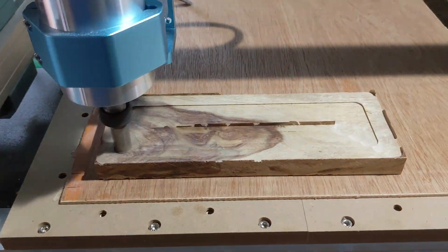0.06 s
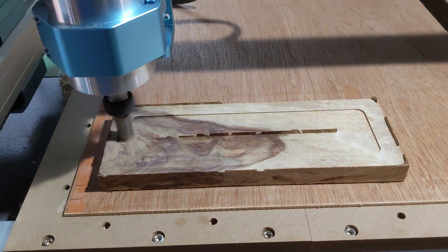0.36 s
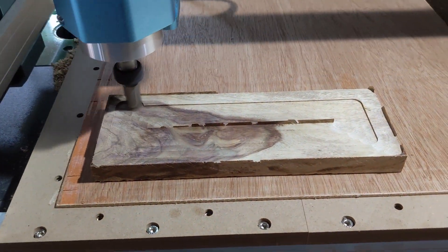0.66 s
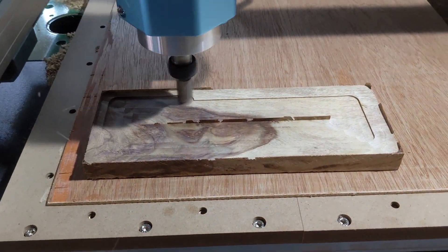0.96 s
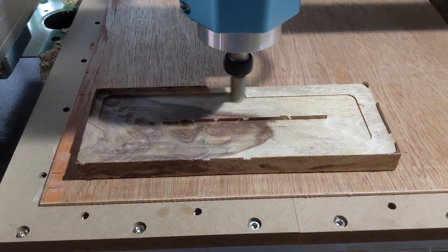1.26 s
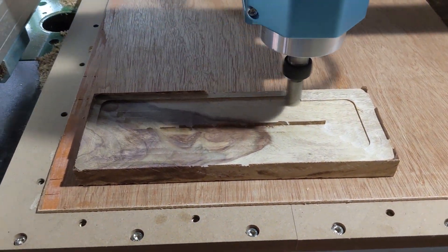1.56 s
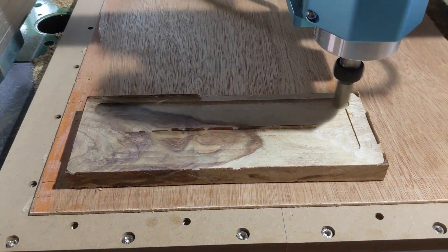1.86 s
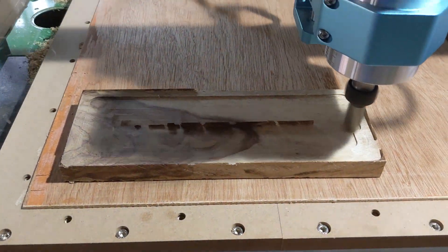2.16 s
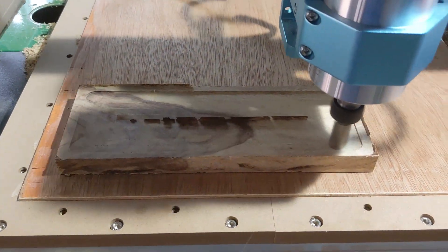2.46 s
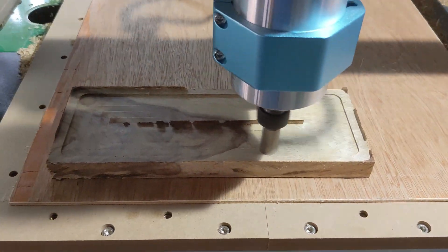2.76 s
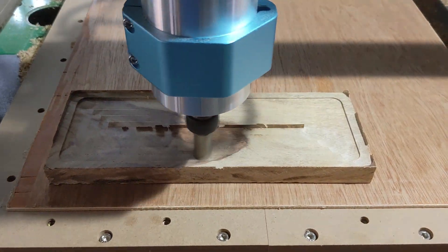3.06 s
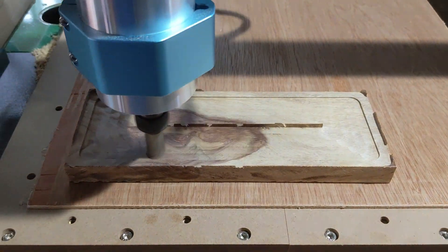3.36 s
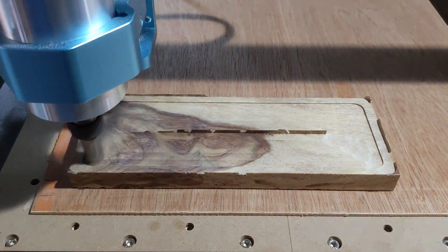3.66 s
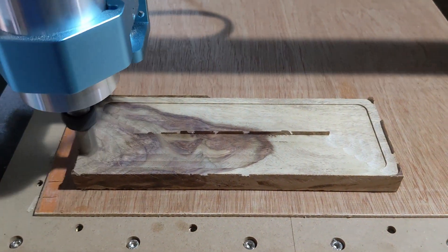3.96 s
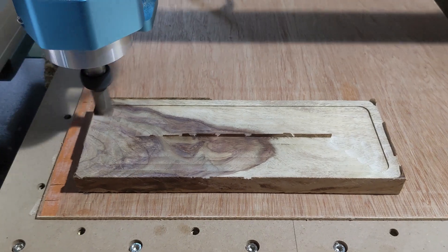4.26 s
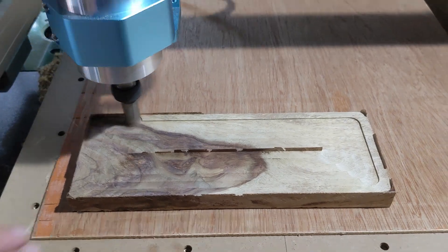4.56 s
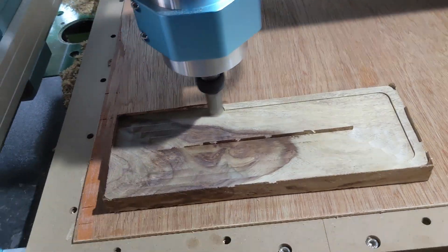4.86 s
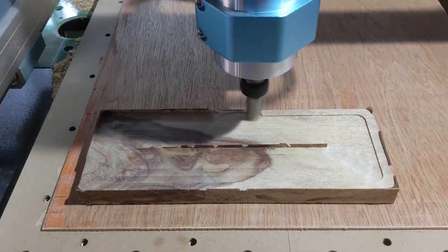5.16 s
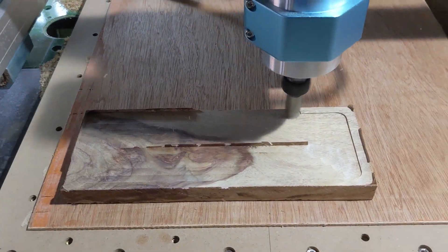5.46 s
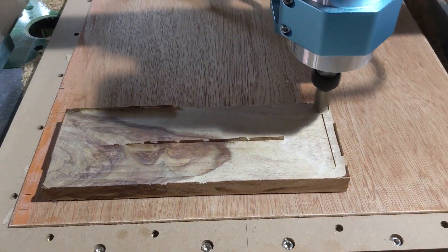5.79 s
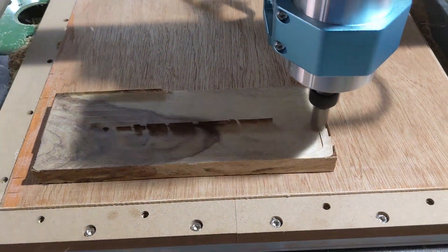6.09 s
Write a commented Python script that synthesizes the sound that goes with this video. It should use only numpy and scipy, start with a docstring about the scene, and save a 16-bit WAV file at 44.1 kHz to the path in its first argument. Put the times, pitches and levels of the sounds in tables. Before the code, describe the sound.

From the first moment, a carving machine's spindle whines at a high, constant pitch, heard from close by as its bit skims a wooden board. A fluttering rush of cooling air and rasping chips runs with it, and the moving frame rumbles faintly underneath, a little more around 2 seconds and near the end. The overall level stays fairly even, but tones within the whine swell, ease and shift gently between left and right as the head travels. Thin squeals flare where the bit bites, around 1.5, 2.7 and 3.2 seconds, then in a brighter cluster from 4.3 to 4.9 seconds and again near 5.6. The cutting rasp grows slightly stronger around 5.3 seconds, and the dust hiss is a bit brighter late on. A few dull bumps are barely audible. The machine is still running at the end, about 6 seconds in.

```python
"""Carving machine lapping a board

A spindle at about 30000 rpm skims its bit nearly twice round a wooden board. Shaft orders (harmonics
of the rotation) whine over a fluttering rush of cooling air and rasping chips; the gantry rumbles
faintly. As the head travels, the sound shifts between two close microphones and tones swell and ease."""
import sys
import numpy as np
from scipy import signal
from scipy.io import wavfile
from scipy.ndimage import uniform_filter1d

SR = 44100
rng = np.random.default_rng(int(sys.argv[2]) if len(sys.argv) > 2 else 0)


def master(y):
    """Save y as 16-bit WAV."""
    cut = np.clip(np.atleast_2d(y).T, -1, 1)
    pcm = np.round(cut * 32767)  # scale
    wavfile.write(sys.argv[1], SR, pcm.astype(np.int16))


N = 274743
TIME = np.arange(N) / SR
SHAFT_HZ, TOP_HZ = 506.25, 15750

# The board's corners: near left, far left, far right, near right.
# Each row: steps right of the middle, steps nearer than the middle.
CORNERS = [(-1, 1), (-1, -1), (1, -1), (1, 1)]
# When the head turns each corner, in seconds, clockwise from near left.
CORNER_TIMES = [.04, .62, 1.85, 2.35, 3.72, 4.42, 5.7, 6.25]
# Stereo delay of the moving head. Each row: time in seconds, lag of the left microphone in ms.
LEFT_LAG = [(0.0, 0.12), (0.16, 0.17), (0.4, 0.13), (1.02, 0.13), (1.27, 0.082), (1.85, -0.01),
            (2.25, -0.015), (2.79, 0.04), (3.5, 0.16), (3.85, 0.189), (4.1, 0.14), (4.45, 0.15),
            (4.66, 0.18), (4.88, 0.08), (5.54, 0.023), (6.22, -0.017)]
# The core of the whine; pan is always left minus right. Each row: order, base level in dB, its change
# per step right and per step nearer, pan in dB, its change per step right and per step nearer,
# left phase lead in radians, reflected share from 0 to 1.
STRONG_TONES = [(1, -51, -5.5, -0.86, 4, 4, 1, 1, 0.06), (2, -51.5, 1.5, -0.5, 1, 0.5, 0.41, 0.38, 0.12),
                (3, -47.5, 1.36, 2.4, -0.5, 0, 1, -1.03, 0.08),
                (8, -40.5, -0.54, 0.94, 1.9, 2.5, -2.9, 0.11, 0.02),
                (12, -58.5, .9, -0.8, -9.5, 3.5, -2.8, 0.85, 0.27),
                (24, -65.5, 0, 0, 0, 2, -.4, 0.14, 0.24)]
# The sheen on the whine. Each row: order, relative level in dB, pan in dB.
WEAK_TONES = [(4, -56, -4.5), (5, -60.5, 0), (6, -54, 8), (7, -57.5, 0), (9, -57.5, 12), (10, -61.5, 5),
              (11, -69, -3), (13, -59.5, 1), (14, -62.5, -45), (15, -64.5, -7), (16, -59.5, -26),
              (17, -62, 25), (18, -66, -0.8), (19, -66, -4), (20, -64.5, -2), (21, -63.5, -5.5),
              (22, -68, -5), (23, -63.5, 1), (25, -64, 1), (26, -79, -2), (27, -76, -4), (28, -76.6, -7),
              (29, -67, -2), (30, -86, 5), (31, -73, -1)]
# Places on each lap where a tone dips, swells or squeals at a corner. Each row: order, place in sides
# from the near left corner, half width in sides, left gain in dB, right gain in dB.
LAP_SPOTS = [(1, .82, 0.21, -13, -6), (1, 1.65, 0.29, -17, 2.5), (1, 3.67, 0.25, -25, -2),
             (2, 0.15, 0.17, 2.5, 8), (2, 1, 0.22, -7, -3), (2, 2.95, 0.11, 4.5, 4),
             (2, 3.78, .15, -14, -0.5), (3, 0.029, 0.088, -7, -10), (3, 0.34, .12, 5.5, 8.5),
             (3, 0.91, 0.097, -8, -3.5), (3, 1.24, 0.43, 4, -3.5), (3, 2.4, 0.28, 3, 2.5),
             (3, 3.07, 0.11, -10, -4), (3, 3.83, 0.23, 3, -0.5), (4, 3.93, 0.057, 3, 14.5),
             (4, 0.32, 0.16, 12, 5.5), (8, 1.67, 0.6, -1.5, 0), (8, 1.78, 0.15, -1.5, 0),
             (8, 2.57, 0.5, 1.5, 0), (12, 3.03, 0.27, 10, 8.5), (13, 1.98, 0.18, 5, 15),
             (14, 2.03, 0.16, 25, 17.5), (15, 2.37, 0.16, 4, 15), (24, 2.75, 0.28, -9, 10)]
# The bit sings where it bites. Each row: middle and half length in seconds, pitch and half width in Hz,
# lift in dB.
BIT_SQUEALS = [(1.41, 0.29, 4050, 250, 3.5), (1.5, 0.65, 2340, 900, 3.5), (1.5, 0.45, 6075, 250, 7.5),
               (2.66, .22, 8550, 314, 8), (2.683, 0.24, 2480, 250, 11), (3.2, 0.19, 3370, 250, 11.5),
               (3.3, 0.062, 6075, 250, 10), (4.332, .075, 7090, 300, 7), (4.623, 0.22, 4050, 250, 1.5),
               (4.53, 0.023, 4970, 250, 23), (4.52, 0.19, 14700, 1680, 13.5), (4.55, 0.2, 10000, 1500, 7),
               (4.72, 0.074, 6075, 250, 5), (4.8, .2, 5100, 250, 14), (5.52, 0.1, 5440, 990, 4.5),
               (5.6, 0.1, 10500, 400, 13)]
# Tone colour of the rush. Each row: frequency in Hz, relative spectral level in dB, pan in dB,
# left-right likeness from 0 to 1.
RUSH_SPECTRUM = [(30, -27.5, 0, .98), (150, -16.5, -1, 0.97), (387, -9, .5, 0.6), (540, 1.2, -1, 0.93),
                 (760, 2, 2.5, 0.66), (1100, 6, 1.5, 0.54), (1520, 3, 1, 0.22), (2360, -1, -1.5, 0.05),
                 (3930, 7.5, -2.5, 0.66), (4600, -0.6, 0, 0.44), (5300, 1.5, -3.5, 0),
                 (6230, -0.6, -1, 0.1), (7200, -5.5, -3, 0), (11000, -9.5, -2.5, 0), (15300, -13.5, 3, .02)]
# The table top turns the stereo phase. Each row: frequency in Hz, left lead in radians.
TABLE_TOP_PHASE = [(100, -0.099), (700, 0.72), (950, -0.52), (1600, -1.57), (2300, 0.81), (4000, -0.42),
                   (6500, 0.95)]
# Board, housing and the gap between them ring in the rush. Each row: centre and half width in Hz,
# lift in dB, extra dB per step nearer.
RESONANCES = [(194, 36, 4.5, 3.5), (650, 80, 0.8, 0), (925, 22, 7.5, 0), (1392, 25, 5, 1),
              (1617, 86, 2.5, -2.2), (2340, 210, 1.5, 3), (3020, 250, 0, -1.5), (3780, 230, -2, -1.5),
              (5050, 410, 1, -0.9), (6430, 520, 1, 2.5), (11400, 640, 1.5, 0)]
# How the rush swells, from gantry rumble to dust hiss. Each row: centre in Hz, trim in dB, then
# dB added per step right, per step nearer, per dB of cut and per dB of dust.
RUSH_BANDS = [(250, -1, -.9, -0.8, -0.5, 0), (900, .5, 0.9, 0.5, 0.37, -0.6),
              (1580, 1.6, -0.3, -0.7, 0.5, 0), (3900, -0.17, 0.06, -0.05, 1.2, 0),
              (10000, 0, 0, -0.5, 0.5, 1)]
# How hard the bit cuts. Each row: time in seconds, relative level in dB.
CUT_EFFORT = [(0, 0.5), (.3, -1.2), (.5, 1), (2, 0.54), (2.75, 1.5), (3.15, 0.2), (3.95, -0.3), (4.35, 0.5),
              (5.05, .6), (5.3, 3), (5.9, -0.9), (6.23, -.2)]
# The ride on the dust hiss. Each row: time in seconds, relative level in dB.
DUST_HISS = [(0, -0.5), (.3, -0.5), (.5, -.5), (2.3, 0.2), (2.8, 0.7), (3.2, 0), (4, 1.1), (4.35, 2.5),
             (5.3, 0.8), (6.23, 2.3)]
# The head shudders and chops the rush. Each row: rate in Hz, depth from 0 to 1.
HEAD_SHUDDER = [(16.5, 0.04), (33.5, 0.12), (43.1, 0.14)]
# Dull gantry bumps. Each row: start in seconds, level in dB, pitch in Hz, decay in seconds.
GANTRY_BUMPS = [(.32, -69, 37.8, .018), (2.53, -66, 66, 0.019), (3.739, -65.5, 221, 0.023)]


def whine(angle):
    """The lead tones: unbalance, two flutes and the fan's shrill eighth order follow the head's place."""
    _, across, nearness = head_route()
    out = np.zeros((2, N))
    for order, db, across_db, near_db, pan_db, pan_across, pan_near, lead, reflected in STRONG_TONES:
        gain = amp(db + across_db * across + near_db * nearness)
        pan = pan_gains(pan_db + pan_across * across + pan_near * nearness)
        out += gain * pan * shaft_tone(angle, order, lead, reflected)
    return out


def overtones(angle, trim_db=-5.0, treble_db=-1.0):
    """The weaker orders: a diffuse sheen, about half of it reflections."""
    out = np.zeros((2, N))
    for order, db, pan_db in WEAK_TONES:
        gain = amp(db + trim_db + treble_db * order * SHAFT_HZ / TOP_HZ)
        out += gain * pan_gains(pan_db) * shaft_tone(angle, order, lead=0, reflected=0.51)
    return out


def shaft_angle(drift_hz=0.27, drift_rate_hz=3):
    """The shaft's turn in radians; its speed hunts very slightly."""
    speed_hz = SHAFT_HZ + drift_hz * unit_rms(wander(drift_rate_hz).real)
    return 2 * np.pi * np.cumsum(speed_hz) / SR


def shaft_tone(angle, order, lead, reflected, sway_rad=0.99, sway_hz=0.72):
    """One order in stereo: a direct tone plus reflections that shift as the head moves."""
    lag_s = envelope(LEFT_LAG) / 1000
    left = np.exp(0.5j * (lead - 2 * np.pi * order * SHAFT_HZ * lag_s))
    direct = np.array([left, left.conj()])
    smear_hz = 7 + 0.9 * order  # moving reflections smear high orders more
    echoes = np.array([wander(smear_hz), wander(smear_hz)])
    arrival = np.sqrt(1 - reflected) * direct + np.sqrt(reflected) * echoes
    path_phase = 2 * np.pi * rng.random() + sway_rad * unit_rms(wander(sway_hz).real)
    tone = np.sqrt(2) * (arrival * np.exp(1j * (order * angle + path_phase))).real
    return tone * squeal_gain(order) * lap_spot_gain(order)


def squeal_gain(order):
    """An order flares when the flutes bite and the bit sings near its pitch."""
    middle_s, half_s, pitch_hz, half_hz, lift_db = np.transpose(BIT_SQUEALS)
    t = np.linspace(0, TIME[-1], num=2048)
    bites = np.exp(-((t - middle_s[:, None]) / half_s[:, None]) ** 2)
    in_tune = np.exp(-((order * SHAFT_HZ - pitch_hz) / half_hz) ** 2)
    extra_power = (in_tune * (amp(lift_db) ** 2 - 1)) @ bites
    return np.interp(TIME, t, np.sqrt(1 + extra_power))


def lap_spot_gain(order):
    """An order dips, swells or squeals at the same places on every lap, by its own amount on each side."""
    place = head_route()[0]
    sides, db = len(CORNERS), np.zeros((2, 1))
    for spot_order, centre, width, left_db, right_db in LAP_SPOTS:
        if spot_order == order:
            away = (place - centre + sides / 2) % sides - sides / 2
            db = db + np.array([[left_db], [right_db]]) * np.exp(-(away / width) ** 2)
    return amp(db)


def rush(level_db=-41.5, patchy_db=1.5, rumble_db_per_ms=50):
    """Air and chips: a bed of broad noise that swells with the cut and drifts in the stereo image."""
    frame, hop = 1024, 256
    hz = np.fft.rfftfreq(frame, 1 / SR)
    t = np.arange(N // hop + 5)[:, None] * hop / SR
    lag_ms, cut_db, dust_db = [envelope(table, t) for table in (LEFT_LAG, CUT_EFFORT, DUST_HISS)]
    _, across, nearness = head_route(t)
    colour_db, pan_db, likeness = spectra(RUSH_SPECTRUM, hz)

    noise = rng.standard_normal((5, len(t), len(hz)))
    left, unrelated = noise[0] + 1j * noise[1], noise[2] + 1j * noise[3]
    lead = spectra(TABLE_TOP_PHASE, hz)[0] - 2 * np.pi * hz * lag_ms / 1000
    right = (likeness * left + np.sqrt(1 - likeness ** 2) * unrelated) * np.exp(-1j * lead)

    ring_db = sum((db + near_db * nearness) * np.exp(-((hz - centre) / width) ** 2)
                  for centre, width, db, near_db in RESONANCES)
    trim_db, across_db, nearer_db, per_cut, per_dust = spectra(RUSH_BANDS, hz)
    swell_db = trim_db + across_db * across + nearer_db * nearness + per_cut * cut_db + per_dust * dust_db
    # the gantry rumbles more at the right end of the board, where the lag is smallest
    rumble_db = rumble_db_per_ms * (lag_ms.mean() - lag_ms) / (1 + (hz / 130) ** 4)
    # soft random patches in time and pitch keep the bed alive
    patches = uniform_filter1d(noise[4], size=30, axis=0)
    patches = unit_rms(uniform_filter1d(patches, size=8, axis=1))
    shape_db = colour_db + ring_db + swell_db + rumble_db + patchy_db * patches

    frames = np.array([left, right]) * pan_gains(pan_db)[:, None] * amp(shape_db)
    _, air = signal.istft(frames.transpose(0, 2, 1), nperseg=frame, noverlap=frame - hop)
    return amp(level_db) * unit_rms(air[:, :N])


def flutter(air, angle, turn_depth=0.055, flute_depth=0.021, grain_db=1.22, grain_hz=80):
    """Chop to add to the rush: puffs from each turn and flute, head shudder and uneven wood grain."""
    puffs = 1 + turn_depth * np.cos(angle) + flute_depth * np.cos(2 * angle)
    shudder = 1 + sum(depth * np.cos(2 * np.pi * (hz * TIME + rng.random())) for hz, depth in HEAD_SHUDDER)
    grain = amp(grain_db * unit_rms(wander(grain_hz).real))
    chop = unit_rms(puffs * shudder * grain) - 1
    low_cut = signal.butter(4, 400, "high", fs=SR, output="sos")  # the deep rumble stays smooth
    return signal.sosfiltfilt(low_cut, air * chop)


def gantry_knocks():
    """Far back in the mix, the gantry gives a soft low bump now and then."""
    out = np.zeros(N)
    for start_s, db, hz, decay_s in GANTRY_BUMPS:
        age = np.maximum(TIME - start_s, 0)
        bump = age / decay_s * np.exp(1 - age / decay_s)
        out += amp(db) * bump * np.sin(2 * np.pi * hz * age)
    return out


def head_route(t=TIME):
    """The head glides from corner to corner: its place in sides, its steps right and its steps nearer."""
    place = np.interp(t, CORNER_TIMES, np.arange(len(CORNER_TIMES)))
    sides = len(CORNERS)
    across, nearness = [np.interp(place, np.arange(sides), c, period=sides) for c in np.transpose(CORNERS)]
    return place, across, nearness


def wander(rate_hz, size=4096):
    """A smooth, complex random modulator of rms one, moving at up to about the given rate."""
    hz = np.fft.fftfreq(size, TIME[-1] / size)
    noise = rng.standard_normal(size) + 1j * rng.standard_normal(size)
    smooth = np.fft.ifft(noise / np.sqrt(1 + (hz / rate_hz) ** 4))
    return np.interp(TIME, np.linspace(0, TIME[-1], size), unit_rms(smooth))


def envelope(table, t=TIME):
    """Straight ramps between timed breakpoints."""
    return np.interp(t, *np.transpose(table))


def spectra(table, hz):
    """One curve per value column, joined on a log frequency axis."""
    points_hz, *columns = np.transpose(table)
    return [np.interp(np.log(hz + 1), np.log(points_hz), c) for c in columns]


def pan_gains(pan_db):
    """Equal-power left and right gains."""
    ratio = amp(np.atleast_1d(pan_db))
    return np.array([ratio, np.ones_like(ratio)]) * np.sqrt(2 / (1 + ratio ** 2))


def amp(db):
    """Decibels to gain."""
    return 10 ** (np.asarray(db) / 20)


def unit_rms(x):
    """Scales to an rms of one."""
    return x / np.sqrt(np.mean(abs(x) ** 2) + 1e-20)


def scene():
    """The mix: one shaft drives the tones and chops the rush, with the gantry underneath."""
    angle, air = shaft_angle(), rush()
    fluttering_air = air + flutter(air, angle)
    return whine(angle) + overtones(angle) + fluttering_air + gantry_knocks()


def record(dry):
    """A steep high cut takes off the very top."""
    high_cut = signal.firwin(511, TOP_HZ, window=("kaiser", 9), fs=SR)
    return signal.oaconvolve(dry, high_cut[None], "same")


dry = scene()
out = record(dry)
master(out)
```